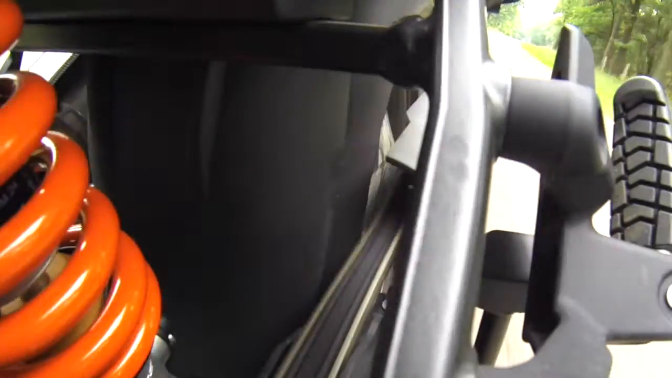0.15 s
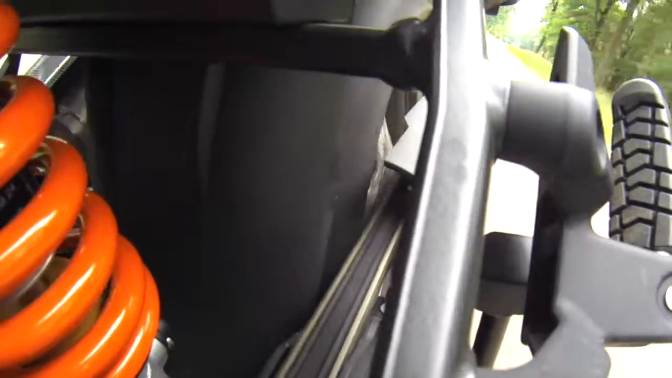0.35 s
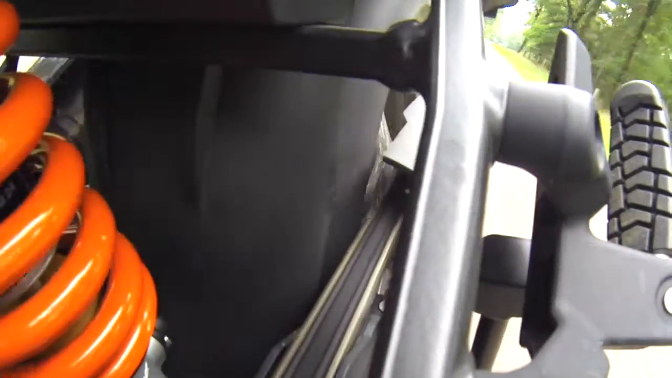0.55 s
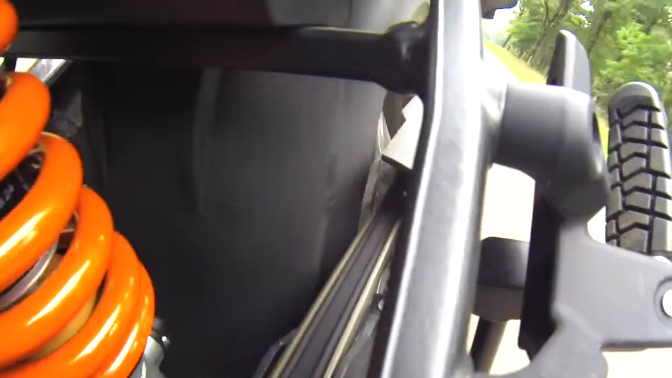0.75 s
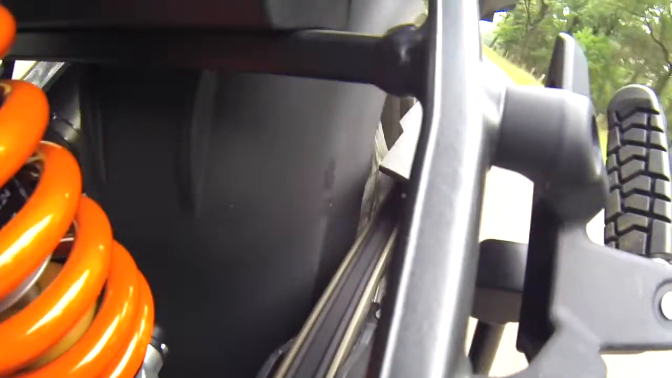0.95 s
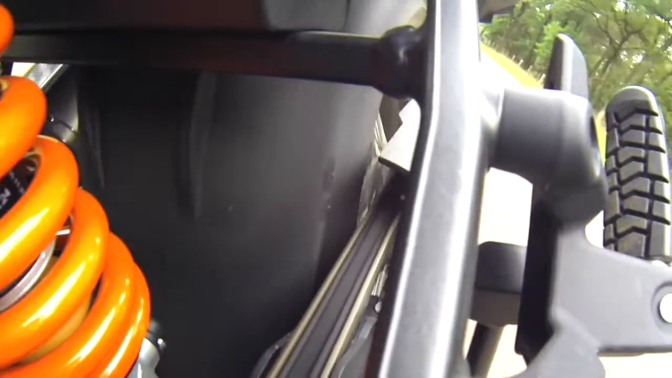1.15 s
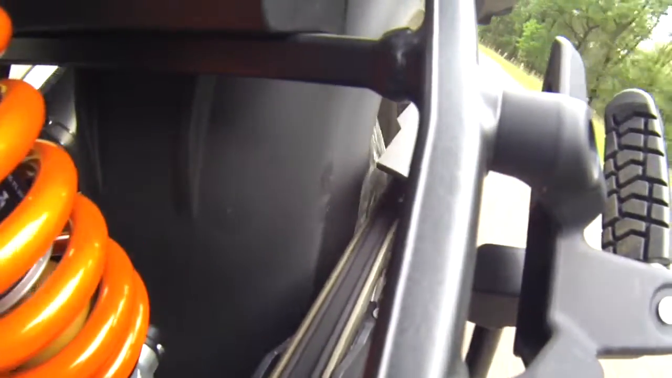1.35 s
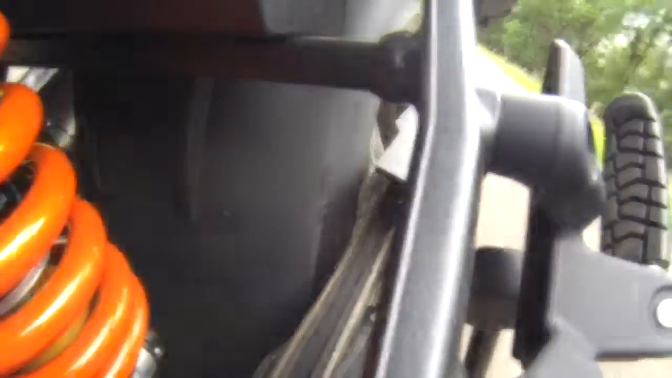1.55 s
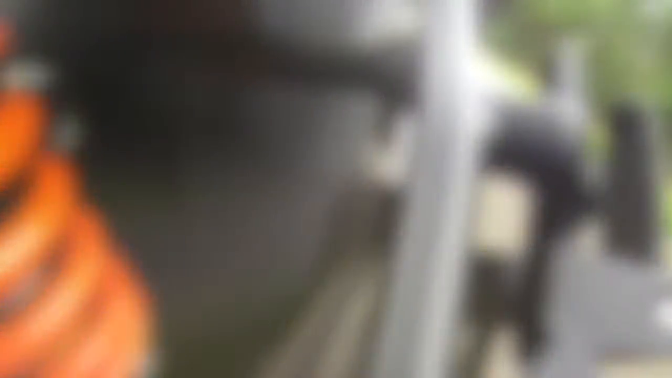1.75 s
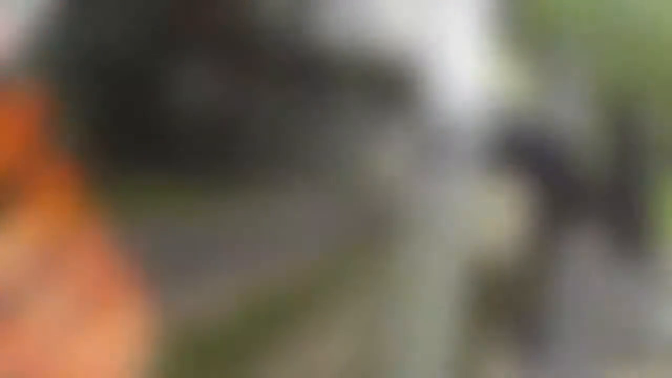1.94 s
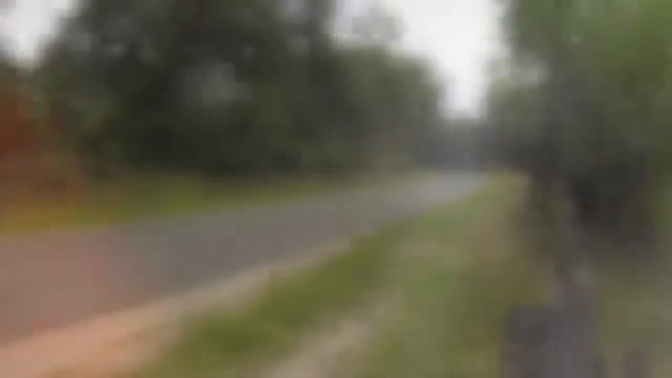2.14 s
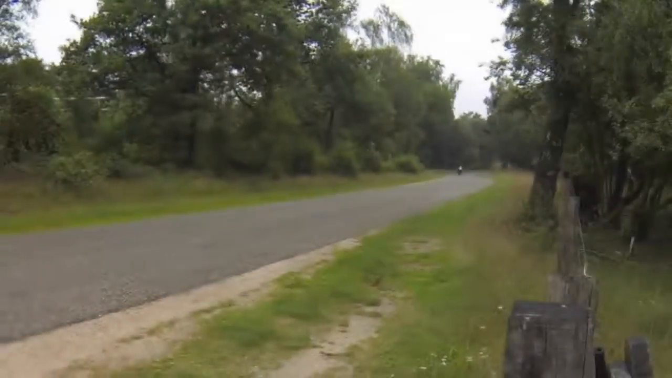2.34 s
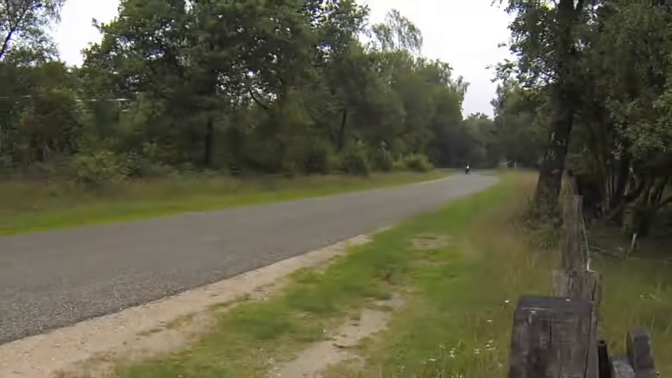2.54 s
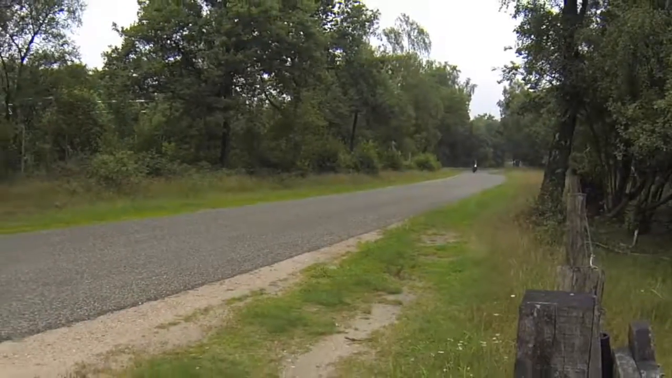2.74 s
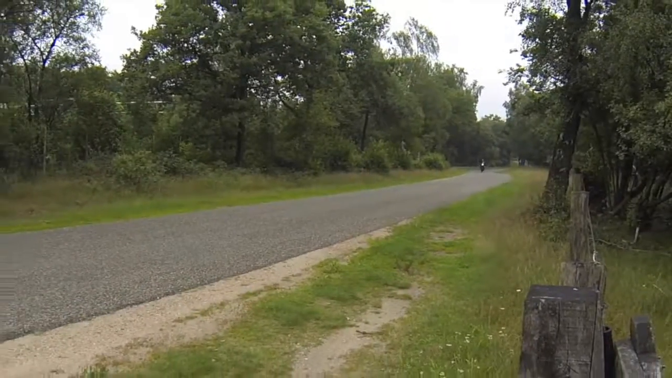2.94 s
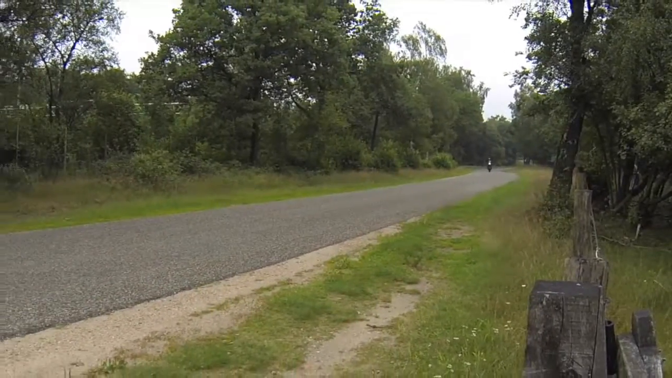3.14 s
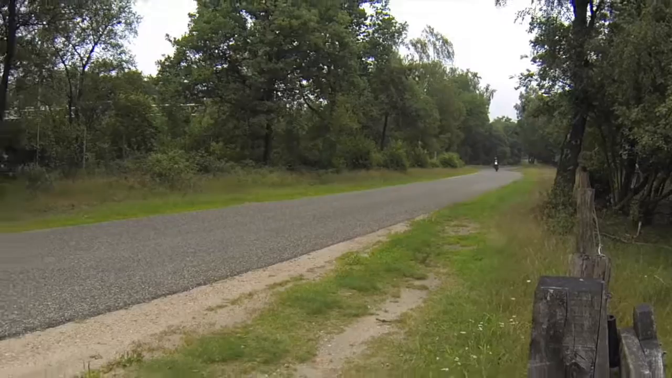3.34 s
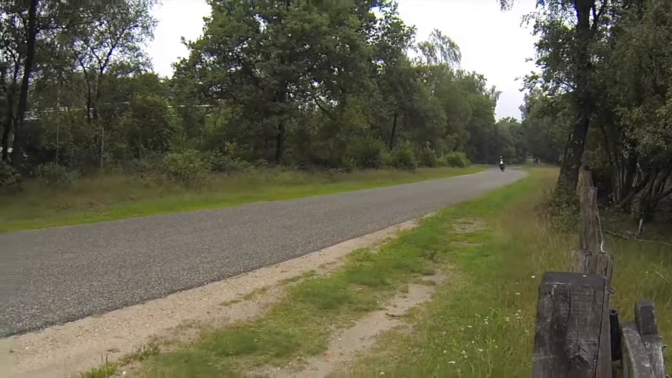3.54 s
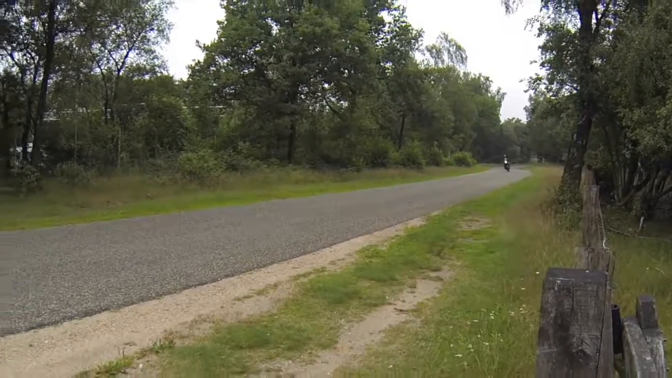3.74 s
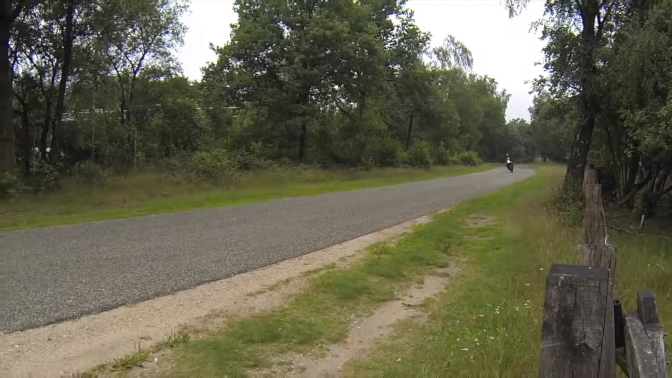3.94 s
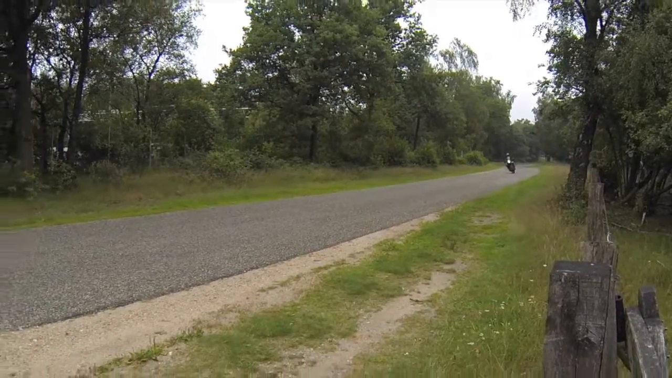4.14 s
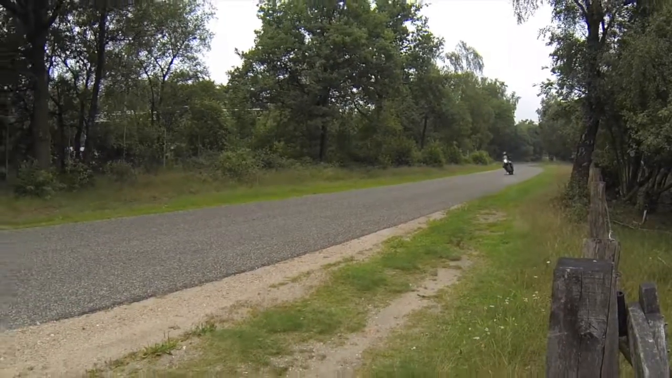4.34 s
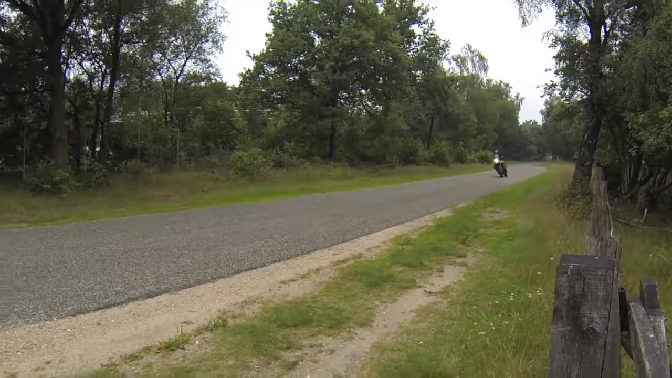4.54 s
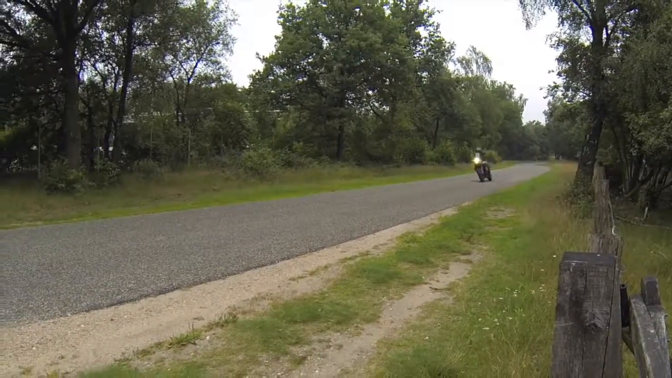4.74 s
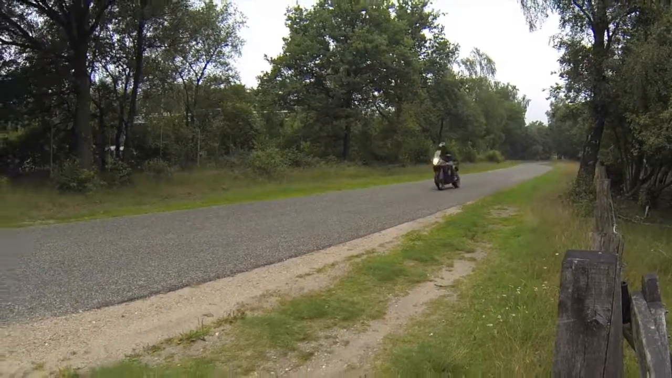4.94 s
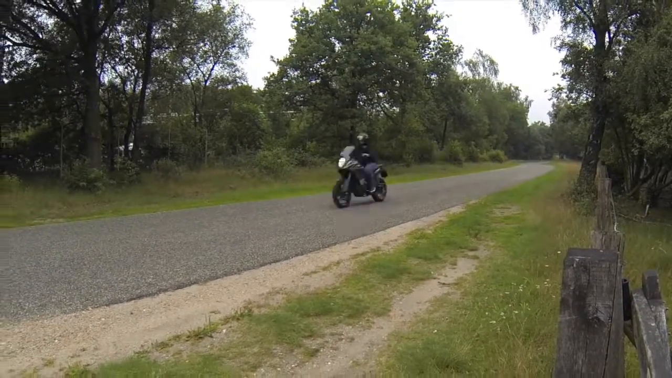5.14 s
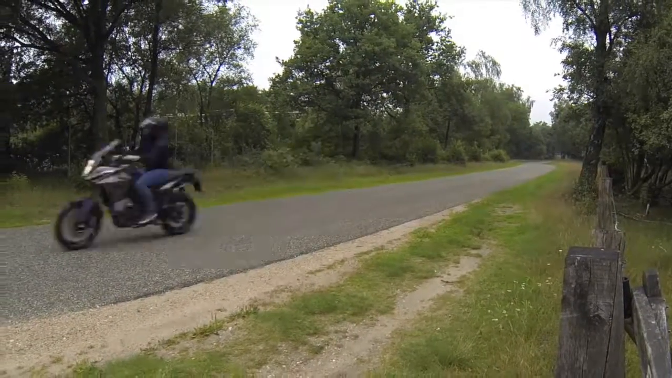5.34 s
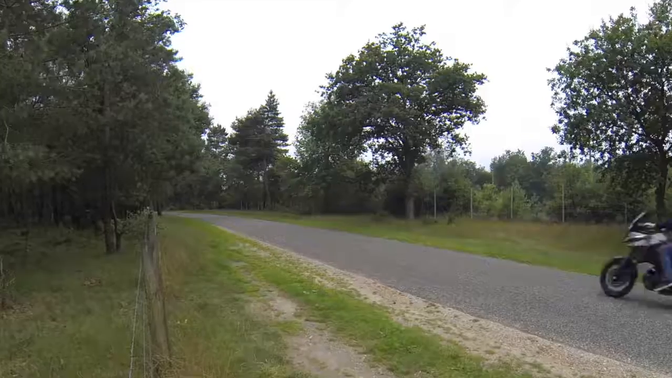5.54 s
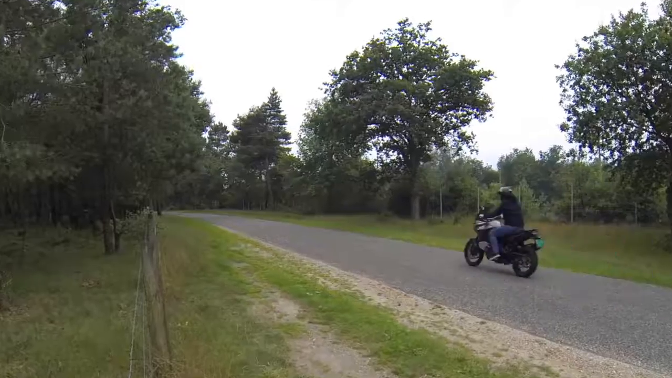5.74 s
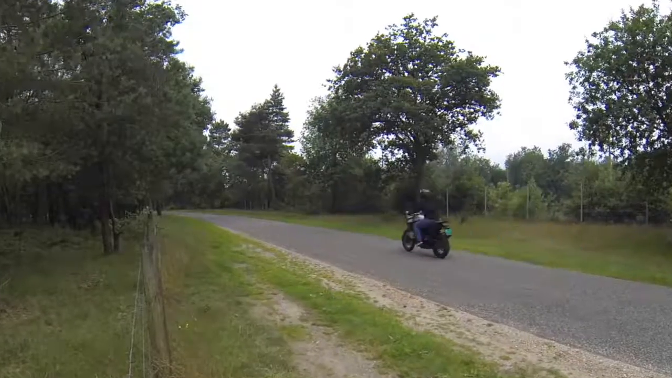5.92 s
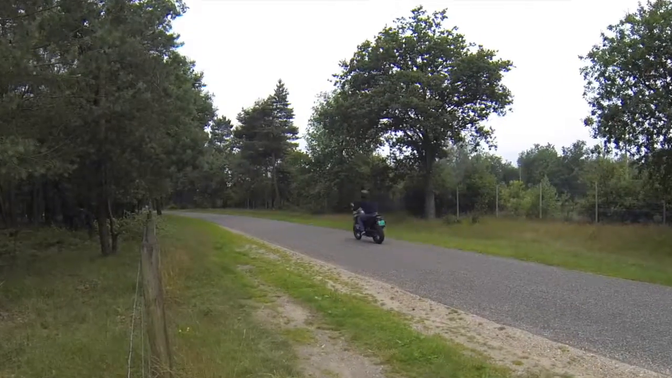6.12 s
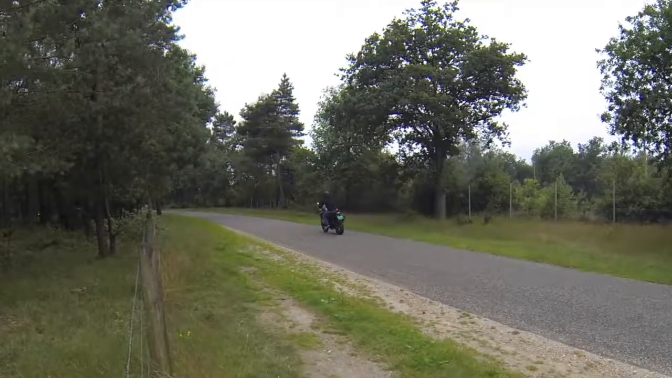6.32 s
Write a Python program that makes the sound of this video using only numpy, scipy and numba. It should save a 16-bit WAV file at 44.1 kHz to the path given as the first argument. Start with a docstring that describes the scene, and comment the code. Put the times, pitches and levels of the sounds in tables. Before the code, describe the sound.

A motorcycle drones and rattles up close, then approaches along a wooded road after a bird call and thumps away.

```python
"""A V-twin motorcycle drones and rattles, heard on board beside the rear wheel. This dissolves to the
verge of a wooded road: a bird calls, the bike comes up from far off, then, after a cut, thumps away.
Two uneven firings per cycle ring the exhaust and the frame; tyres roar, the chain and valves hiss.
At the verge, distance and heading set the bike's levels, Doppler shift and rolling-noise colour."""
import sys
import numpy as np
from scipy import signal
from scipy.fft import rfft, irfft
from scipy.io import wavfile
from scipy.ndimage import uniform_filter1d, map_coordinates
from numba import njit

SR = 44100
rng = np.random.default_rng(int(sys.argv[2]) if len(sys.argv) > 2 else 0)


def pcm_store(signal):
    """Save signal as 16-bit PCM."""
    levels = np.round(np.clip(np.atleast_2d(signal), -1, 1) * 32767)
    wavfile.write(sys.argv[1], SR, levels.astype(np.int16).T)


N = 281358
TIME = np.arange(N) / SR
SECOND_FIRING = 435 / 720  # share of the 720 degree cycle

# frame resonance (frequency [Hz], width [Hz], gain [dB])
FRAME_MODES = [(712, 62, -2)]
# airbox resonances (frequency [Hz], width [Hz], gain [dB], change side-on [dB])
AIRBOX_MODES = [(618.5, 72, 4, -3), (739, 29, 4, -16), (797, 38, -8, -27)]


def undb(db):
    """Decibels to gain."""
    return 10 ** (np.asarray(db) / 20)


def level(x, db):
    """Scale to rms 1, then by a level or level curve."""
    return x * undb(db) / np.sqrt(np.mean(x ** 2))


def curves(table):
    """Table columns, interpolated linearly in time."""
    times_s, *columns = np.transpose(table)
    return [np.interp(TIME, times_s, column) for column in columns]


def noise():
    """White noise."""
    return rng.standard_normal(N)


def walk(rate_hz):
    """Random steps, smoothed twice; rms 1."""
    hold = int(SR / rate_hz)
    steps = np.repeat(rng.standard_normal(N // hold + 1), hold)
    return level(uniform_filter1d(uniform_filter1d(steps, hold), hold)[:N], 0)


def colour(x, spectrum, size=16384):
    """Minimum-phase filter from (Hz, dB) points, by the folded cepstrum."""
    hz, db = np.transpose(spectrum)
    grid_hz = np.maximum(np.arange(size // 2 + 1) * SR / size, 1)
    gain = undb(np.interp(np.log(grid_hz), np.log(hz), db))
    cepstrum = irfft(np.log(gain))
    cepstrum[1:size // 2] *= 2
    cepstrum[size // 2 + 1:] = 0
    return signal.fftconvolve(x, irfft(np.exp(rfft(cepstrum))))[:N]


def ring(x, modes):
    """Parallel resonances, each applied twice for steep skirts."""
    out = 0
    for hz, width_hz, db in modes:
        b, a = signal.iirpeak(hz, hz / (1.36 * width_hz), fs=SR)
        out = out + undb(db) * signal.lfilter(b, a, signal.lfilter(b, a, x))
    return out


def shifted(x, ratio):
    """Resample a noise, scaling its frequencies by the ratio."""
    return map_coordinates(x, [np.cumsum(ratio)], order=3, mode="wrap")


@njit
def notch(x, hz, width_hz, depth):
    """Moving state-variable notch; depth 1 nulls the centre."""
    out, band_state, low_state = np.empty(len(x)), 0., 0.
    for i in range(len(x)):
        g, damping = np.tan(np.pi * hz[i] / SR), width_hz / hz[i]
        band = (band_state + g * (x[i] - low_state)) / (1 + g * (g + damping))
        band_state = 2 * band - band_state
        low_state += 2 * g * band
        out[i] = x[i] - depth[i] * damping * band
    return out


def path(speed_m_s=20.5, nearest_m=4.5, pass_s=5.45, sound_m_s=343):
    """Distance [m], heading (1 head-on, 0 side-on, -1 tail-on) and Doppler ratio."""
    ahead_m = speed_m_s * (pass_s - TIME)
    distance_m = np.hypot(ahead_m, nearest_m)
    heading = ahead_m / distance_m
    return distance_m, heading, 1 / (1 - heading * speed_m_s / sound_m_s)


def carried(db_at_1m, off_axis, loss_db_m, side_loss_db):
    """Level at the verge [dB] after spreading, ground and air loss, and beaming along the road."""
    distance_m, _, _ = path()
    return db_at_1m - 20 * np.log10(distance_m) - loss_db_m * distance_m - side_loss_db * off_axis


def cycles(hz, firing_s):
    """Running count of engine cycles, whole at firing_s."""
    count = np.cumsum(hz) / SR
    return count + (-np.interp(firing_s, TIME, count)) % 1


def firings(cycle, second_db, scatter_db, jitter_s):
    """One pulse per cylinder and cycle, scattered in size and time."""
    pulses = np.zeros(N)
    for offset, db in ((0, 0), (SECOND_FIRING, second_db)):
        due = np.arange(1 + offset, cycle[-1])
        late, strong = rng.standard_normal((len(due), 2)).T
        at = (np.interp(due, cycle, TIME) + jitter_s * late) * SR
        np.add.at(pulses, np.clip(at.astype(int), 0, N - 1), -undb(db + scatter_db * strong))
    return pulses


def puffs(cycle, depth_db, lag, width):
    """Noise that swells per firing (dips if depth_db < 0); lag and width in cycles."""
    swell = sum(np.exp(-(np.sin(np.pi * (cycle - lag - offset)) / (np.pi * width)) ** 2)
                for offset in (0, SECOND_FIRING))
    return noise() * undb(depth_db * swell)


def tree_reverb(x, t60_s):
    """Scatter from the trunks: a diffuse tail of unit energy."""
    t = TIME[:SR]
    tail = rng.standard_normal(SR) * undb(-60 * t / t60_s) * (t > .015)
    return signal.fftconvolve(x, tail / np.sqrt(np.sum(tail ** 2)))[:N]


def trunk_echoes(x):
    """Echoes of a moving source come and go, so its drone throbs unevenly."""
    # colour of the scatter (frequency [Hz], gain [dB])
    wood = [(90, 1), (135, 2), (180, -6), (225, -2), (270, 2), (330, 6), (450, 5), (600, -2)]
    scattered = colour(x, wood)
    return sum(np.roll(scattered, int(lag_s * SR)) * walk(20) for lag_s in rng.uniform(.01, .08, 5))


def bird():
    """Unsteady whistles that swell and fade as they glide."""
    # (start [s], length [s], first pitch [Hz], last pitch [Hz], peak [dB])
    notes = [(2.334, .054, 3300, 2880, -41), (2.392, .066, 2850, 3220, -43.5),
             (2.528, .014, 4850, 4350, -51), (2.540, .062, 4200, 3280, -45),
             (2.602, .046, 3290, 3300, -44.5)]
    call, waver = np.zeros(N), 1 + 0.0076 * walk(300)
    for start_s, length_s, first_hz, last_hz, db in notes:
        along = np.clip((TIME - start_s) / length_s, 0, 1)
        hz = (first_hz + (last_hz - first_hz) * along) * waver
        call += undb(db) * np.sin(np.pi * along) * np.sin(2 * np.pi * np.cumsum(hz) / SR)
    return call + undb(-6.5) * tree_reverb(call, t60_s=0.57)


def verge():
    """A low wavering rumble and wind in the leaves."""
    # roadside rumble (frequency [Hz], gain [dB])
    rumble = [(15, -16), (28, -6), (45, -5.5), (62, -2.5), (84, 2), (100, -3), (130, -12.5), (300, -32.5),
              (6000, -110)]
    # leaf rustle (frequency [Hz], gain [dB])
    leaves = [(100, -19), (700, -10), (1100, -3.5), (1500, -8.5), (2000, -20.5), (3200, -20.5), (4300, -29),
              (7500, -35), (10000, -46), (15000, -59)]
    low = level(colour(noise(), rumble), -30 + 0.9 * walk(22.86))
    return low + level(colour(noise(), leaves), -42 + 0.9 * walk(4))


def buffet(ease_db):
    """Air buffets the listener on board."""
    # wind (frequency [Hz], gain [dB])
    spectrum = [(12, -14), (26, 0), (60, -3.5), (110, -4), (250, -10), (450, -15.5), (1000, -29),
                (12000, -100)]
    return level(colour(noise(), spectrum), -31.5 + ease_db + 1.4 * walk(12))


def phasing(x, width_hz=600.):
    """Two hollows sweep up through the rolling noise at the pass."""
    # (time [s], lower centre [Hz], upper centre [Hz], depth [0-1])
    hollows = [(4.9, 1850, 4150, 0), (5.15, 2000, 4150, .45), (5.35, 2200, 4300, .65),
               (5.45, 2500, 4450, .75), (5.5, 2800, 4950, .7), (5.55, 3000, 6000, .5)]
    low_hz, high_hz, depth = curves(hollows)
    return notch(notch(x, low_hz, width_hz, depth), high_hz, width_hz, depth)


def grit(stone_width_hz=1800, decay_s=0.011):
    """Close by, sand sizzles under the tyres and flicked stones ring briefly."""
    # (frequency [Hz], width [Hz], gain [dB])
    sand_bands = [(5400, 1700, 3), (7400, 1900, -4)]
    # (time [s], ring [Hz], onset level [dB])
    stones = [(5.254, 5850, -30), (5.324, 8200, -31), (5.36, 7500, -32), (5.395, 5450, -24),
              (5.438, 8200, -31), (5.462, 6900, -28)]
    _, heading, _ = path()
    grains = noise() * undb(4 * walk(400))
    sand_db = carried(-4, (1 - heading) ** 2, loss_db_m=2.1, side_loss_db=12)
    out = phasing(level(ring(grains, sand_bands), sand_db))
    for at_s, hz, db in stones:
        stone = level(ring(noise(), [(hz, stone_width_hz, 0)]), db)
        out += stone * (TIME >= at_s) * np.exp(-np.abs(TIME - at_s) / decay_s)
    return out


def rolling_front(cycle, heading):
    """Tyre roar and chain hiss shift upward as the bike turns side-on."""
    # (frequency [Hz], gain [dB])
    tyre_spectrum = [(15, -13), (40, -3.5), (110, 0), (250, -0.5), (400, -4.5), (650, 0), (880, -3.5),
                     (1100, -4.5), (1380, -11.5), (1620, -21.5), (2600, -35.5), (12000, -100)]
    # (frequency [Hz], gain [dB])
    hiss_spectrum = [(1000, -2), (1900, -2.5), (2400, 3.5), (3000, 6), (3650, 5.5), (4200, -1.5),
                     (5000, 4.5), (6300, 1), (7600, 0.5), (9000, -3.5), (11000, -13.5), (15000, -28)]
    tyre_db = carried(-4, front_off_axis(heading), loss_db_m=0.15, side_loss_db=0.33)
    hiss_db = carried(-10, front_off_axis(heading), loss_db_m=0.23, side_loss_db=3.5)
    far_roar = undb(-33.5)  # carried by the wood
    tyres = shifted(colour(noise(), tyre_spectrum), 0.91 + 0.38 * np.sqrt(1 - heading ** 2))
    tyres = level(tyres, 0.28 * walk(13)) * np.hypot(undb(tyre_db), far_roar)
    hiss = colour(puffs(cycle, depth_db=2, lag=0.049, width=0.14), hiss_spectrum)
    hiss = shifted(hiss, 0.97 + 0.11 * (1 - heading))
    # air absorbs the treble at a distance
    far = np.clip((1.5 - hiss_db) / 40, 0, 1)
    dull = signal.lfilter(*signal.butter(1, 3000, fs=SR), hiss)
    return phasing(tyres + level((1 - far) * hiss + far * dull, hiss_db))


def front_off_axis(heading):
    """The forward beam is broad; its loss levels off once the bike is past."""
    return np.minimum(1 - heading, 1.15) ** 2


def rolling_rear(cycle, off_axis):
    """From behind, tyre roar dips and hiss swells with each firing."""
    # (frequency [Hz], gain [dB])
    tyre_spectrum = [(40, 6.5), (250, 6.5), (450, 8.5), (700, 7), (1000, -0.5), (1500, -2.5), (1900, -11.5),
                     (3000, -16.5), (12000, -87)]
    # (frequency [Hz], gain [dB])
    hiss_spectrum = [(1000, -18), (2100, -2), (2550, 6), (3000, 8), (3700, 6), (4250, 2.5), (5400, 4),
                     (6500, -1), (8200, -4), (9500, -11.5), (11000, -19), (15000, -32)]
    tyre_db = carried(-2.5, off_axis, loss_db_m=0.091, side_loss_db=17.4)
    hiss_db = carried(-11.7, off_axis, loss_db_m=0.17, side_loss_db=3.5)
    tyres = colour(puffs(cycle, depth_db=-4.5, lag=0.17, width=0.13), tyre_spectrum)
    hiss = colour(puffs(cycle, depth_db=6, lag=.02, width=0.33), hiss_spectrum)
    return level(tyres, tyre_db) + level(hiss, hiss_db + 0.98 * walk(20))


def chain_whine(off_axis):
    """The chain whines from behind, higher when side-on."""
    # (tail-on frequency [Hz], width [Hz], gain [dB])
    modes = [(2850, 150, 0), (3450, 150, -4), (4650, 200, -8)]
    whine = shifted(ring(noise(), modes), 1 + 0.2 * off_axis)
    return level(whine, carried(-19.5, off_axis, loss_db_m=0.25, side_loss_db=2))


def chain_rattle(cycle):
    """On board, the chain hisses and rings; every firing strikes the sprocket."""
    # (time [s], relative level [dB])
    envelope = [(0.0, -40.5), (0.22, -40.5), (0.47, -44.5), (0.56, -40.5), (0.7, -42), (0.81, -45),
                (0.95, -40), (1.09, -44), (1.18, -42.5), (1.56, -41.5), (1.7, -43.5), (2.0, -44.5)]
    # (frequency [Hz], gain [dB])
    hiss_spectrum = [(300, 6.5), (950, 8.5), (1150, 9), (1400, 2.5), (1900, 0.5), (2450, -6.5),
                     (3400, -3.5), (4100, -9.5), (4600, -1.5), (5300, -9.5), (7000, -10), (9000, -15),
                     (11000, -23), (15000, -40)]
    # (frequency [Hz], width [Hz], gain [dB])
    chain_modes = [(3094, 200, -0.5), (3447, 106, 3), (3730, 99, 1), (4380, 150, -4), (4650, 99, -3),
                   (4900, 110, -1.5), (5510, 220, -5.5), (6010, 210, -6), (7230, 170, -14)]
    # (frequency [Hz], width [Hz], gain [dB])
    sprocket_modes = [(1690, 215, 0)]
    rattle_db, = curves(envelope)
    hiss = colour(puffs(cycle, depth_db=3, lag=0.26, width=0.18), hiss_spectrum)
    hiss += ring(puffs(cycle, depth_db=5, lag=0.29, width=0.15), chain_modes)
    soft = signal.lfilter(*signal.butter(1, 5000, fs=SR), hiss)
    flickering_top = (hiss - soft) * undb(1.6 * walk(42.9))
    sprocket = ring(puffs(cycle, depth_db=13, lag=0.3, width=0.16), sprocket_modes)
    return level(soft + flickering_top, rattle_db + 6) + level(sprocket, rattle_db + 2)


def chain_slaps():
    """The chain hits the swingarm and rings the frame."""
    # (time [s], peak [dB])
    slaps = [(.702, -25), (1.165, -20)]
    out = np.zeros(N)
    for at_s, db in slaps:
        knock = ring(signal.unit_impulse(N, int(at_s * SR)), FRAME_MODES)
        out += undb(db) * knock / np.abs(knock).max()
    return out


def frame_ring(cycle):
    """The engine shakes the frame with blows and rattle."""
    # (time [s], relative level [dB])
    envelope = [(0.0, -34), (0.12, -33), (0.24, -34.5), (0.3, -38.5), (0.48, -34), (0.61, -36),
                (0.70, -28.5), (0.82, -39), (0.96, -30.5), (1.08, -30), (1.12, -42), (1.21, -35),
                (1.29, -29.5), (1.35, -34), (1.5, -32), (1.85, -34.5), (1.99, -32), (2.04, -41)]
    frame_db, = curves(envelope)
    blows = firings(cycle, second_db=-3.5, scatter_db=0.5, jitter_s=8e-5)
    rattle = puffs(cycle, depth_db=7, lag=0.3, width=0.12)
    return level(ring(level(blows, 0) + level(rattle, -5), FRAME_MODES), frame_db + 1)


def intake_front(cycle, heading):
    """Gulps and rushing air ring the airbox, its colour turning with the bike; the cases clatter."""
    # engine cases (frequency [Hz], width [Hz], gain [dB])
    case_modes = [(978, 105, 1.5), (1510, 110, -6)]
    gulps = firings(cycle - .1, second_db=4.5, scatter_db=2.5, jitter_s=12e-5)
    rush = puffs(cycle, depth_db=7, lag=0.1, width=0.14)
    intake = level(gulps, 0) + level(rush, 2)
    turned = np.minimum(1 - heading, 1)
    growl = sum(ring(intake, [mode]) * undb(side_db * turned) for *mode, side_db in AIRBOX_MODES)
    growl_db = carried(-3, front_off_axis(heading), loss_db_m=0.34, side_loss_db=2.9)
    # the cases beam across the road, so their loss grows end-on
    clatter_db = carried(-9.5, heading ** 2, loss_db_m=0, side_loss_db=22)
    return level(growl, growl_db) + level(ring(rush, case_modes), clatter_db)


def intake_rear(cycle):
    """The lowest airbox ring lingers while the bike is close."""
    growl = ring(puffs(cycle, depth_db=7, lag=0.1, width=0.14), [AIRBOX_MODES[0][:3]])
    return level(growl, carried(-1, 0, loss_db_m=2.24, side_loss_db=0))


def silencer(x, turn_hz, q):
    """An all-pass chamber smears each pulse into a short pressure swing."""
    w = 2 * np.pi * turn_hz
    return signal.lfilter(*signal.bilinear([1, -w / q, w * w], [1, w / q, w * w], fs=SR), x)


def exhaust_on_board(cycle, ease_db):
    """Firings of steady size, the second in each cycle weaker, ring the pipe in a steady drone."""
    # one firing (frequency [Hz], gain [dB])
    spectrum = [(20, -29.5), (41, 3), (82, -7), (122, -9.5), (163, 3), (205, -11.5), (290, -13.5),
                (370, -12), (560, -20.5), (1000, -25.5), (2000, -82), (12000, -110)]
    pulses = firings(cycle, second_db=-5.5, scatter_db=0, jitter_s=4e-5)
    return level(colour(pulses, spectrum), -33 + ease_db)


def exhaust_front(cycle, heading):
    """The pipe points away; its echoes swell less than the direct drone as the bike nears."""
    # one firing (frequency [Hz], gain [dB])
    spectrum = [(20, -36), (44, 0.5), (88, -1), (133, -5.5), (178, 0.5), (222, -8.5), (267, -2.5),
                (315, -9.5), (355, -11), (405, -17), (450, -18), (492, -12), (600, -20), (730, -24),
                (805, -21), (900, -40), (1300, -58), (12000, -110)]
    pulses = firings(cycle, second_db=-7.5, scatter_db=1, jitter_s=8e-5)
    drone = silencer(colour(pulses, spectrum), turn_hz=210, q=1.3)
    drone_db = carried(4.2, front_off_axis(heading), loss_db_m=0.085, side_loss_db=4)
    return level(drone, drone_db) + level(trunk_echoes(drone), .7 * drone_db - 16)


def exhaust_rear(cycle, off_axis):
    """Hard thumps: the boom spreads all round, the bark grows as the pipe's mouth faces the listener."""
    # one firing (frequency [Hz], gain [dB])
    spectrum = [(18, -30), (36, 2), (76, 2.5), (113, -9.5), (150, 7), (190, 4), (230, 8.5), (305, 4),
                (385, -5.5), (485, -9), (565, -6), (640, -19), (950, -61), (2500, -42), (12000, -100)]
    # (frequency [Hz], width [Hz], gain [dB])
    tail_pipe_modes = [(475, 70, 0)]
    pulses = firings(cycle, second_db=-8, scatter_db=.5, jitter_s=3e-5)
    thump = silencer(colour(pulses, spectrum), turn_hz=420, q=.85)
    boom = signal.sosfiltfilt(signal.butter(2, 110, fs=SR, output="sos"), thump)
    bark = ring(thump, tail_pipe_modes)
    pipe = level(thump, carried(8.6, off_axis, loss_db_m=0, side_loss_db=19))
    pipe += level(boom, carried(-5.5, off_axis, loss_db_m=0.12, side_loss_db=1.5))
    pipe += level(bark, carried(3.5, off_axis, loss_db_m=0.088, side_loss_db=114))
    return pipe + undb(-22) * tree_reverb(pipe, t60_s=.35)


def on_board():
    """Beside the rear wheel; exhaust and wind sink as the throttle eases."""
    # (time [s], cycle rate [Hz])
    engine_speed = [(0.0, 39.34), (0.75, 40.68), (1.8, 41.3)]
    hz, = curves(engine_speed)
    cycle = cycles(hz, firing_s=0.002485)
    ease_db = -1.56 * TIME
    bike = exhaust_on_board(cycle, ease_db) + frame_ring(cycle) + chain_rattle(cycle)
    return bike + buffet(ease_db) + chain_slaps()


def coming():
    """The bike approaches, its pitch raised by Doppler shift."""
    # (time [s], cycle rate at the bike [Hz])
    engine_speed = [(3.3, 41.06), (4.75, 42.58), (5.4, 41.3)]
    hz, = curves(engine_speed)
    _, heading, doppler = path()
    cycle = cycles(hz * doppler, firing_s=5.208)
    engine = exhaust_front(cycle, heading) + intake_front(cycle, heading)
    return engine + rolling_front(cycle, heading) + grit()


def going():
    """The bike recedes, its pitch lowered by Doppler shift."""
    # (time [s], cycle rate at the bike [Hz])
    engine_speed = [(5.85, 39.58), (6.25, 39.87), (6.38, 41)]
    hz, = curves(engine_speed)
    _, heading, doppler = path()
    cycle = cycles(hz * doppler, firing_s=5.9382)
    off_axis = 1 + heading
    return (exhaust_rear(cycle, off_axis) + rolling_rear(cycle, off_axis)
            + intake_rear(cycle) + chain_whine(off_axis))


def scene():
    """The ride dissolves into the approach, which cuts to the bike from behind."""
    fade_start_s, fade_end_s, cut_s = 1.78, 2.35, 5.553
    dissolve = np.clip((TIME - fade_start_s) / (fade_end_s - fade_start_s), 0, 1)
    behind = np.clip((TIME - cut_s) / 0.0037, 0, 1)
    road = (1 - behind) * coming() + behind * going() + verge() + bird()
    return ((1 - dissolve) * on_board() + np.sqrt(dissolve) * road)[None]


def record(dry):
    """Soft clip, 4 ms fade-out, 15 kHz low-pass."""
    rounded = np.tanh(0.84 * dry) / 0.82
    closing = np.clip((TIME[-1] - TIME) / .004, 0, 1)
    return signal.sosfilt(signal.ellip(8, .2, 80, 15000, fs=SR, output="sos"), rounded * closing)


dry = scene()
out = record(dry)
pcm_store(out)
```